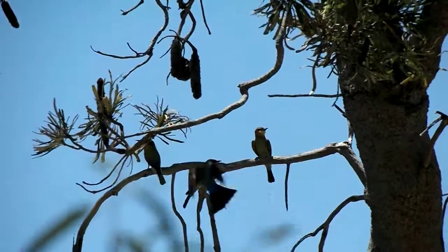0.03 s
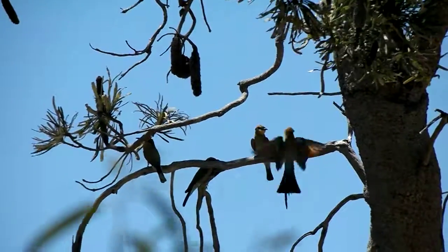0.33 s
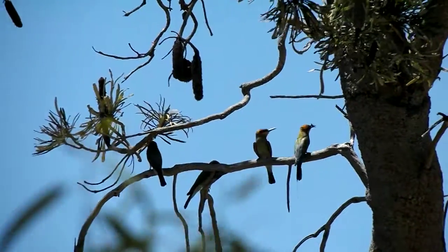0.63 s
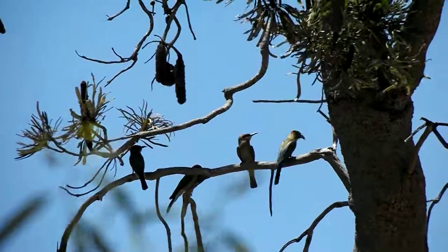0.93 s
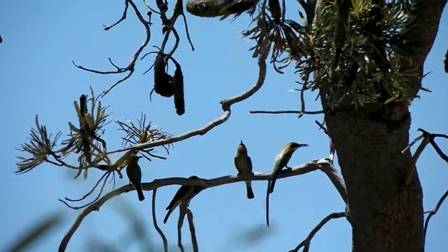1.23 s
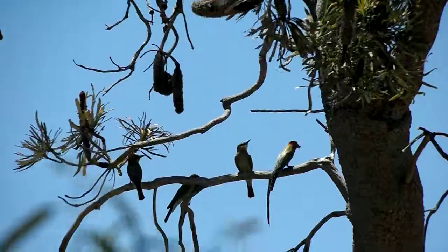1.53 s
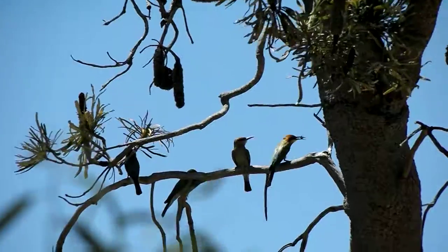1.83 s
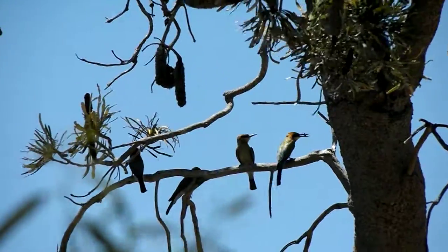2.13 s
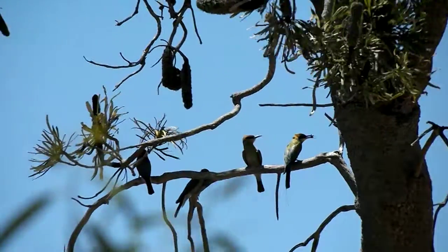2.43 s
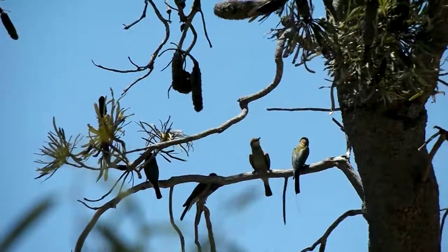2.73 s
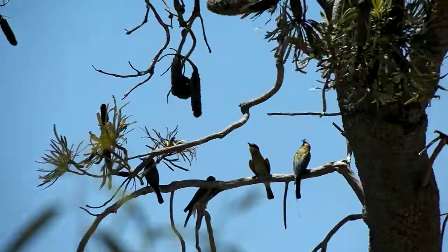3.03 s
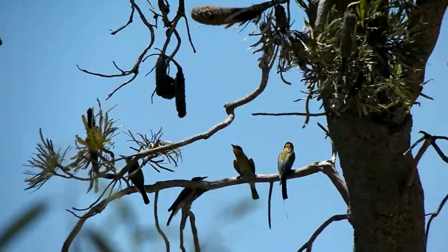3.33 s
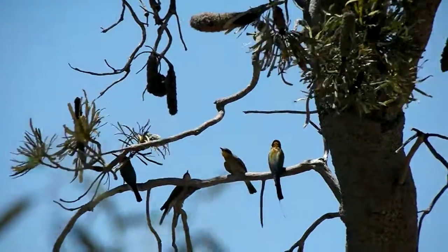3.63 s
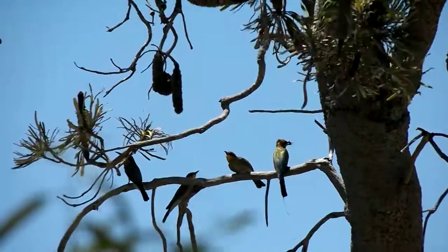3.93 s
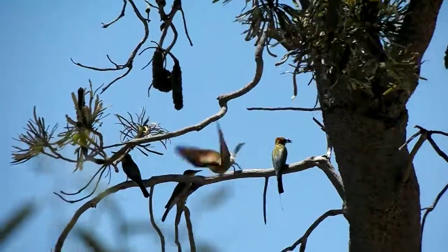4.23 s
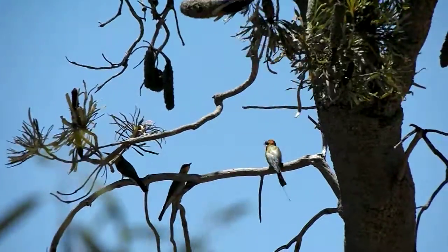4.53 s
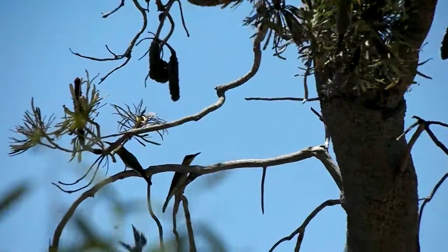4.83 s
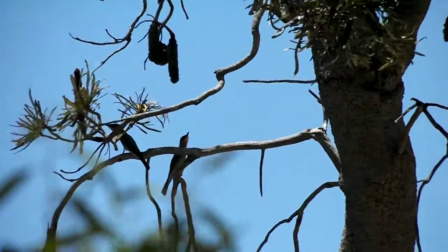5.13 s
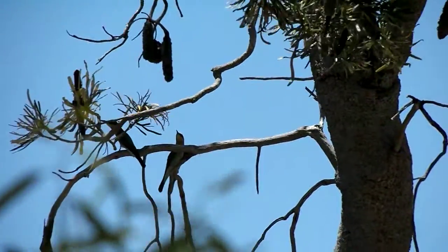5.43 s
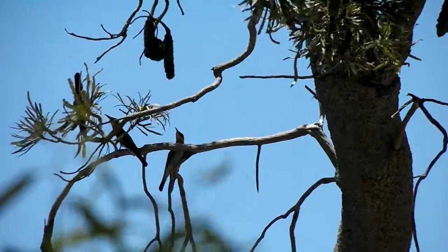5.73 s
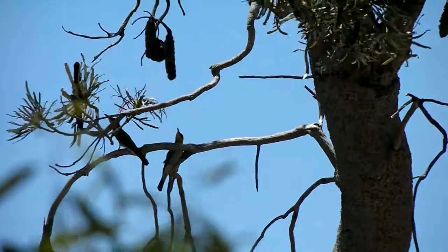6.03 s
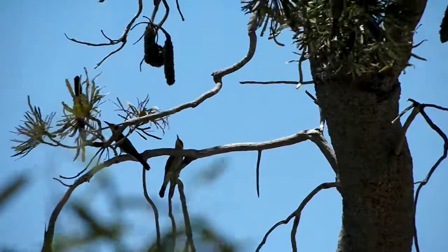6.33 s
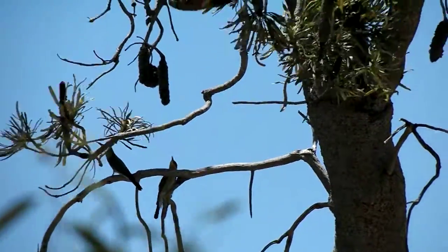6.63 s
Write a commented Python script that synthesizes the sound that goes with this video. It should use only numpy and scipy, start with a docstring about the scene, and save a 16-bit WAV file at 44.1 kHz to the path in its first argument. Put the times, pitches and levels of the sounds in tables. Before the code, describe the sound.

Outdoors among trees, uneven gusts bump and churn on the microphone over a low rumble and soft hiss. Far-off birds chirp faintly at first, then a nearer one adds short rising peeps. Just past halfway, after the strongest gust, a close bird repeats a clear two-part whistle about four times a second and its peeping neighbour grows louder. A bill snaps once, twigs tick lightly, and the birds have a short, slight echo.

```python
"""Bee-eaters on a branch in open woodland: close by, one whistles two-part calls and another gives
short rising peeps, while others answer from distant trees. A bill snaps once, bills and twigs tick,
and trunks and leaves scatter a short echo. At the microphone, gusts break into eddies that thump
and churn, with a few dry clicks, over a low rumble and a faint steady hiss."""
import sys
import numpy as np
from scipy import signal
from scipy.fft import rfft, irfft, next_fast_len
from scipy.io import wavfile
from scipy.ndimage import map_coordinates

SR = 44100
rng = np.random.default_rng(int(sys.argv[2]) if len(sys.argv) > 2 else 0)


def transcribe(signal):
    """Save signal, clipped to [-1, 1], as a 16-bit WAV file at the path in sys.argv[1]."""
    frames = np.atleast_2d(signal).T
    limited = np.clip(frames, -1, 1)
    pcm = np.round(limited * 32767).astype(np.int16)
    wavfile.write(sys.argv[1], SR, pcm)


N = 294147


def amp(db):
    """Decibels to gain."""
    return 10 ** (np.asarray(db) / 20)


def unit(x):
    """x at rms 1."""
    return x / np.sqrt(np.mean(x ** 2) + 1e-20)


def wobble(rate, size):
    """A smooth random curve, rate knots a second."""
    knots = rng.standard_normal(size // 8 + 4)
    return map_coordinates(knots, [np.arange(size) * rate / SR], mode="mirror")


def swell(u, rounding):
    """A rise and fall as u goes from 0 to 1: flat-topped for a small rounding, arched for a large one."""
    return np.tanh(np.sin(np.pi * np.clip(u, 0, 1)) / rounding) / np.tanh(1 / rounding)


def filtered(x, response):
    """x through a filter whose gain is response(hz)."""
    size = next_fast_len(len(x) + 8192)
    return irfft(rfft(x, size) * response(np.fft.rfftfreq(size, 1 / SR)), size)[:len(x)]


def noise(spectrum):
    """Noise of rms 1, shaped by rows of f/Hz, relative level/dB."""
    f, db = np.transpose(spectrum)
    white = rng.standard_normal(N)
    return unit(filtered(white, lambda hz: amp(np.interp(np.log(hz + 1), np.log(f), db))))


def add(track, s, sound):
    """Mix a sound into the track from time s."""
    part = track[max(round(s * SR), 0):][:len(sound)]
    part += sound[:len(part)]


# Light air at the microphone between gusts: t/s, level/dB
LIGHT_AIR = [(0, -66.5), (.85, -64.5), (1.45, -63.5), (1.8, -60.5), (2.3, -71), (2.6, -65), (3.1, -54),
             (3.6, -63.5), (4.6, -53), (5.1, -61.5), (6.67, -57.5)]
# Gusts reaching the microphone: t/s, length/s, level/dB
PASSING_GUSTS = [(0, 0.04, -53), (0.391, 0.39, -44), (0.895, 0.024, -56.5), (1.025, 0.045, -53),
                 (1.22, 0.17, -46.5), (1.563, 0.031, -57.5), (1.921, 0.23, -55.5), (2.494, 0.094, -56),
                 (3.092, .13, -50.5), (3.705, 0.33, -47.5), (4.14, 0.235, -49.5), (4.443, 0.089, -47.5),
                 (4.722, 0.089, -45.5), (4.909, 0.12, -46), (5.225, 0.15, -45), (5.526, 0.33, -45),
                 (5.958, .1, -47.5), (6.294, 0.255, -48.5)]
def wind_db(t, rise_s=0.047, fall_s=0.026):
    """Wind strength at times t: each gust rises, holds and dies back into the breeze."""
    gusts = sum(amp(db) * np.interp(t, [s - rise_s, s, s + length, s + length + fall_s], [0, 1, 1, 0])
                for s, length, db in PASSING_GUSTS)
    breeze = amp(np.interp(t, *np.transpose(LIGHT_AIR)))
    return 20 * np.log10(np.hypot(gusts, breeze))


def eddies(s, gain, hz, round_hz, port_hz=2000):
    """Each eddy is one pressure swing, round if slow, sharp if fast; the microphone port softens it."""
    offset = np.arange(-SR // 100, SR // 100)
    hz = hz[:, None]
    roundness = round_hz / hz
    pulse = (1 - 2j * np.pi * hz * offset / SR / (roundness + 0.5)) ** -(roundness + 1)
    random_phase = np.exp(2j * np.pi * rng.random(len(s)))[:, None]
    swing = gain[:, None] * (random_phase * pulse).real * np.hanning(len(offset))
    index = np.clip(np.round(s * SR).astype(int)[:, None] + offset, -1, N) + 1
    pressure = np.bincount(index.ravel(), swing.ravel(), N + 2)[1:N + 1]
    return filtered(pressure, lambda f: 1 / (1 + (f / port_hz) ** 6))


def small_eddies(count=1100, lift_db=3, scatter_db=7, centre_hz=275, sharpen=0.013, spread=0.3):
    """A stream of small eddies crosses the microphone; more wind makes them louder and brighter."""
    level_chance, pitch_chance = rng.standard_normal((count, 2)).T
    s = (np.arange(count) + rng.random(count)) * N / SR / count
    strength = wind_db(s)
    db = strength + scatter_db * np.minimum(level_chance, 1.3)
    hz = centre_hz * np.exp(sharpen * (db - strength.mean()) + spread * pitch_chance)
    return eddies(s, amp(db + lift_db), hz, round_hz=1300)


# Spectrum of large slow eddies: f/Hz, relative level/dB
RUMBLE_SPECTRUM = [(20, -11), (45, -0.5), (110, 3), (200, -7.5), (400, -14), (800, -10.5), (1600, -40)]
def rumble(db=-61, follow=0.54, lumps_db=2):
    """Large slow eddies at the microphone: a lumpy low rumble that rises with the wind."""
    strength = wind_db(np.arange(N) / SR)
    lumpy = unit(amp(lumps_db * wobble(28, N)) * noise(RUMBLE_SPECTRUM))
    return amp(db + follow * (strength - strength.mean())) * lumpy


# Spectrum of the woodland air: f/Hz, relative level/dB
AIR_SPECTRUM = [(100, 5.5), (300, -17), (450, 3.5), (650, -4.5), (1000, 0.5), (1400, -5), (2200, -6.5),
                (2800, -10), (3900, -12.5), (5200, -10.5), (6300, -10), (8000, -15), (11000, -19),
                (16000, -21)]
def air_hiss(db=-60):
    """The faint steady hiss of still air all around."""
    return amp(db) * noise(AIR_SPECTRUM)


def syrinx(hz, harmonics_db, jitter, flutter_db):
    """A bird's voice: a whistle and any overtones, trembling quickly in pitch and loudness."""
    phase = 2 * np.pi * np.cumsum(hz * (1 + jitter * wobble(396, len(hz)))) / SR
    flutter = amp(flutter_db * wobble(298, len(hz)))
    return flutter * sum(amp(db) * np.sin(k * phase) for k, db in enumerate(harmonics_db, 1))


# Slurs from distant trees: t/s, length/s, crest f/Hz, level/dB
FAR_SLURS = [(.01, 0.1, 3400, -64), (.21, .08, 2900, -64), (0.337, 0.095, 3650, -66),
             (.545, 0.081, 2800, -63), (0.682, .03, 3150, -60.5), (0.722, 0.11, 3550, -61),
             (0.933, 0.061, 3080, -62), (1.002, 0.043, 2750, -58), (1.2, .06, 3050, -61),
             (1.35, 0.094, 3600, -61), (1.448, .08, 2980, -61.5), (1.572, 0.167, 2460, -68),
             (1.724, 0.056, 2810, -62.5), (2.034, 0.09, 2980, -69)]
def far_birds(base_hz=2396, skew=0.59, fade_db=7, broken_db=4):
    """Far-off birds: faint, rough arches that climb faster than they fall, fluttering as they fade."""
    out, t = np.zeros(N), np.arange(SR // 6) / SR
    for s, length, crest_hz, db in FAR_SLURS:
        u = np.minimum(t / length, 1)
        hz = base_hz + (crest_hz - base_hz) * np.sin(np.pi * u ** skew)
        flicker_db = broken_db * np.minimum(wobble(105, len(t)), 1)
        effort = amp(db - fade_db * u + flicker_db) * swell(u, rounding=0.1)
        add(out, s, effort * syrinx(hz, [0], jitter=0.046, flutter_db=3.5))
    return out


# Strong eddies right on the microphone: t/s, level/dB, centre f/Hz
STRONG_EDDIES = [(0.4031, -32.5, 340), (.444, -28, 377), (0.506, -23.5, 370), (0.5272, -32, 330),
                 (0.5297, -22.5, 310), (0.534, -23, 340), (0.6117, -28, 375), (0.6858, -29.5, 366),
                 (0.7062, -19.5, 360), (0.7458, -19, 408), (1.0592, -37, 282), (1.1723, -37, 610),
                 (1.3149, -32, 360), (1.3595, -30.5, 754), (1.3658, -32, 513), (1.9706, -41.5, 350),
                 (2.033, -38, 363), (2.1294, -37.5, 363), (2.5134, -36, 467), (2.5499, -34.5, 605),
                 (3.0877, -30.5, 300), (3.6207, -31.5, 560), (3.7146, -22.5, 990), (3.7266, -18, 520),
                 (3.7809, -15.5, 665), (3.8211, -17.5, 560), (3.8424, -25, 776), (3.8507, -26, 640),
                 (3.9036, -27, 940), (3.9733, -29, 620), (4.007, -24, 394), (4.2223, -30, 640),
                 (4.295, -32, 378), (4.4045, -27.5, 614), (4.4338, -31.5, 745), (4.4675, -19, 490),
                 (4.4781, -24, 620), (4.4897, -23.5, 534), (4.544, -29, 635), (4.5833, -27, 845),
                 (4.6038, -26, 405), (4.6599, -29, 670), (4.9783, -33.5, 730), (5.1262, -30.5, 725),
                 (5.1936, -30, 680), (5.5377, -28.5, 364), (5.563, -27.5, 403), (5.6829, -23, 388),
                 (5.78, -25, 374), (5.9381, -28, 576), (6.2774, -29, 414), (6.351, -29.5, 452),
                 (6.4163, -27.5, 560), (6.5251, -25, 640)]
def buffets():
    """Single strong eddies thump on the microphone."""
    s, db, hz = np.transpose(STRONG_EDDIES)
    return eddies(s, amp(db), hz, round_hz=2200)


# Sharp clicks, heard with no echo: t/s, level/dB
DRY_CLICKS = [(.42, -27), (0.4254, -29.5), (4.0105, -28), (4.0192, -30)]
def clicks(relax_s=0.00046):
    """Each click is a sudden step that relaxes at once."""
    out, t = np.zeros(N), np.arange(SR // 100) / SR
    for s, db in DRY_CLICKS:
        add(out, s, amp(db) * np.exp(-t / relax_s))
    return out


def hard_contacts(rows, t60, steepness):
    """Each contact is a brief noise burst whose spectrum rises to a crest and falls steeply above it."""
    out, t = np.zeros(N), np.arange(SR // 30) / SR
    for s, db, hz in rows:
        white = rng.standard_normal(len(t))
        band = filtered(white, lambda f: (f / hz) ** 2 / (1 + (f / hz) ** steepness))
        add(out, s, amp(db - 60 * t / t60) * unit(band))
    return out


# Bills and twigs in the tree: t/s, starting level/dB, crest f/Hz
TREE_TICKS = [(.991, -62, 5300), (1.621, -56, 5340), (3.157, -56.5, 8300), (3.163, -57, 8200),
              (3.174, -64, 8800), (3.347, -57.5, 5570), (5.249, -56, 7500), (5.782, -52, 6500)]
def tree_ticks():
    """Light contacts of bills and twigs carry from the tree as small ticks."""
    return hard_contacts(TREE_TICKS, t60=0.036, steepness=7.2)


# Pairs of peeps from the branch: t/s, spacing/s, length of each/s, first tip f/Hz,
# then level/dB of the first slide, first tip, second slide and second tip
PEEP_PAIRS = [(2.526, 0.065, 0.023, 3050, -50, -61, -47.5, -64),
              (2.794, .04, 0.021, 2980, -48.5, -56, -51, -49.5),
              (3.261, .041, 0.02, 3200, -65, -59.5, -61, -60),
              (3.894, .039, 0.027, 2800, -58, -54, -50, -56), (4.19, 0.044, .021, 3000, -60, -60, -49, -55),
              (4.875, .049, 0.035, 2950, -50, -57, -47.5, -57),
              (4.986, .068, .029, 2810, -46.5, -43, -46, -46),
              (5.124, .071, .029, 3160, -46, -45.5, -49, -46),
              (5.296, 0.03, 0.026, 3030, -50, -45, -57, -60),
              (5.51, .035, 0.03, 2960, -52, -44, -43.5, -42),
              (5.748, .034, 0.028, 3030, -50, -43, -47.5, -37.5),
              (5.986, .035, 0.031, 3010, -45, -42, -39, -39.5),
              (6.27, 0.034, 0.027, 2715, -48, -36.5, -43, -40),
              (6.551, 0.035, 0.033, 2840, -52.5, -50, -44.5, -43)]
def peeps(first_from_hz=2200, second_from_hz=2480, slide_to_hz=2753, second_tip_hz=2983):
    """One bird's thin peeps: each slides up, catches, and jumps to a purer tip."""
    out, t = np.zeros(N), np.arange(SR // 20) / SR
    slide_share, bend = 0.61, 0.63
    for s, spacing, length, first_tip_hz, slide_1, tip_1, slide_2, tip_2 in PEEP_PAIRS:
        slide = t / length / slide_share
        tip = (t / length - slide_share) / (1 - slide_share)
        harmonics_db = [0, np.where(tip > 0, -26, -15)]
        pair = [(s, first_from_hz, first_tip_hz, slide_1, tip_1),
                (s + spacing, second_from_hz, second_tip_hz, slide_2, tip_2)]
        for start, from_hz, tip_hz, slide_db, tip_db in pair:
            hz = np.where(tip > 0, tip_hz, from_hz + (slide_to_hz - from_hz) * slide ** bend)
            effort = amp(slide_db) * swell(slide ** 2, 0.94) + amp(tip_db) * swell(tip, 0.94)
            add(out, start, effort * syrinx(hz, harmonics_db, jitter=0.019, flutter_db=3))
    return out


# Wind hitting the microphone head-on: start t/s, end t/s, start level/dB, end level/dB
HEAD_ON_BLASTS = [(3.727, 3.747, -28.5, -35), (3.747, 3.773, -35.5, -43), (3.782, 3.831, -31.5, -29),
                  (4.466, 4.481, -29, -35), (4.603, 4.613, -37, -50), (4.653, 4.669, -35, -48)]
# Spectrum of the churning air: f/Hz, relative level/dB
CHURN_SPECTRUM = [(80, -51), (200, -18.5), (350, 3.5), (600, 5), (850, 1.5), (1400, -7.5), (2000, -20.5),
                  (2600, -34), (3400, -71)]
def blasts(edge_s=0.0059):
    """Eddies packed so tightly on the microphone that they merge into a short roar."""
    t = np.arange(N) / SR
    force = sum(np.interp(t, [on - edge_s, on, off, off + edge_s], [0, amp(on_db), amp(off_db), 0])
                for on, off, on_db, off_db in HEAD_ON_BLASTS)
    return force * noise(CHURN_SPECTRUM)


# Calls from the near bird: t/s, level/dB, pitch ratio, opening note's relative level/dB, length ratio
NEAR_CALLS = [(3.982, -30.5, 0.99, -3, 0.96), (4.378, -27.5, 0.98, 0, 1.027),
              (4.583, -27.5, 0.96, -0.5, 0.95), (4.798, -27.5, 0.97, -0.5, 1.023),
              (5.016, -26.5, 0.98, 2, 1), (5.244, -26.5, 0.953, -1, 1.01), (5.484, -28, 0.96, 0, 1.025),
              (5.763, -30.5, 0.96, 1, 0.99)]
# Its first five harmonics: relative level/dB
CALL_HARMONICS = [0.5, -38.5, -34, -41, -37.5]
# Two pushes to each note: t/s into the call, length/s, relative level/dB, rounding of the top
CALL_PUSHES = [(0, 0.013, -8, 0.21), (.017, 0.0088, -5, 1.4), (0.035, .009, -9, 1.3),
               (0.041, 0.033, -1.5, 1.9)]
def near_calls(beak_db=3, carry_db=-18, warble=0.0047, warble_hz=135, rasp=0.022, rasp_db=6):
    """The near bird: a note falls ever faster and grows raspy, then a second climbs and levels off."""
    fall_from_hz, fall_to_hz, fall_s = 2070, 1646, 0.026
    climb_from_hz, climb_to_hz, climb_at_s, climb_s = 1860, 2280, 0.037, 0.0121
    kick_hz, kick_s = 250, 0.0014  # the voice starts sharp and settles at once
    turn_s = (fall_s + climb_at_s) / 2
    out, t = np.zeros(N), np.arange(SR // 10) / SR
    for s, db, ratio, opening_db, stretch in NEAR_CALLS:
        age = t / stretch
        opening = age < turn_s
        drop = opening * np.minimum(age / fall_s, 1) ** 2
        fall = fall_from_hz + (fall_to_hz - fall_from_hz) * drop
        climb_left = np.exp(-np.maximum(age - climb_at_s, 0) / climb_s)
        climb = climb_to_hz + (climb_from_hz - climb_to_hz) * climb_left
        hz = ratio * np.where(opening, fall, climb)
        hz *= 1 + warble * drop * np.sin(2 * np.pi * warble_hz * age)
        hz += kick_hz * np.exp(-age / kick_s)
        pushes = sum(amp(level) * swell((age - start) / length, rounding)
                     for start, length, level, rounding in CALL_PUSHES)
        effort = np.maximum(pushes, amp(carry_db) * swell(age / turn_s, rounding=0.44))
        # the beak colours each call anew
        overtones_db = [level + beak_db * rng.standard_normal() + rasp_db * drop
                        for level in CALL_HARMONICS[1:]]
        voice = syrinx(hz, [CALL_HARMONICS[0]] + overtones_db, 0.0065 + rasp * drop, flutter_db=2.24)
        add(out, s, amp(db + opening_db * opening) * effort * voice)
    return out


# A bill closing on the branch: t/s, starting level/dB, crest f/Hz
BILL_SNAPS = [(5.036, -28.5, 6600)]
def bill_snap():
    """A bill snaps shut with one short, bright crack."""
    return hard_contacts(BILL_SNAPS, t60=0.0082, steepness=17)


def woodland(x, t60, build_s):
    """Trunks and leaves scatter a short diffuse tail back to the microphone."""
    t = np.arange(SR // 2) / SR
    tail = rng.standard_normal(len(t)) * amp(-60 * t / t60) * (1 - np.exp(-t / build_s))
    return signal.fftconvolve(x, tail / np.linalg.norm(tail))[:N]


def scene():
    """What reaches the microphone: birds, the far ones with most echo, then clicks, wind and hiss."""
    caller, peeper, far = near_calls(), peeps(), far_birds()
    contacts = bill_snap() + tree_ticks()
    scattered = amp(-21) * caller + amp(-12.5) * peeper + amp(-4) * far
    voice_echo = woodland(scattered, t60=0.39, build_s=0.0074)
    contact_echo = amp(-8) * woodland(contacts, t60=0.34, build_s=0.0009)
    birds = caller + peeper + far + contacts + voice_echo + contact_echo
    return birds + clicks() + small_eddies() + buffets() + blasts() + rumble() + air_hiss()


def record(dry, low_hz=60, notch_hz=7000, notch_width_hz=45, top_hz=15800):
    """The microphone thins the deep bass; the camera cuts one narrow notch and all above top_hz."""
    def response(hz):
        bass_cut = 1j * hz / (low_hz + 1j * hz)
        notch = 1 - np.exp(-((hz - notch_hz) / notch_width_hz) ** 2)
        return bass_cut * notch * (hz < top_hz)
    return filtered(dry, response)


dry = scene()
out = record(dry)
transcribe(out)
```